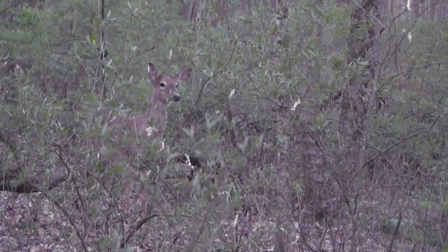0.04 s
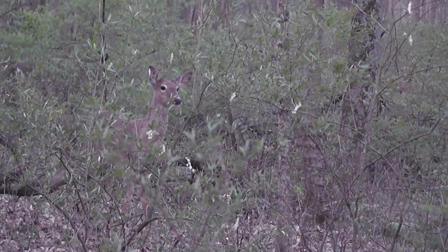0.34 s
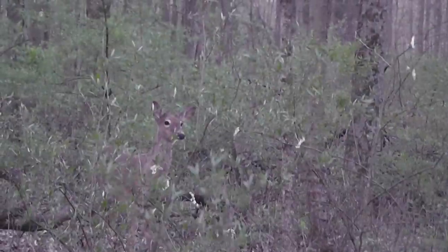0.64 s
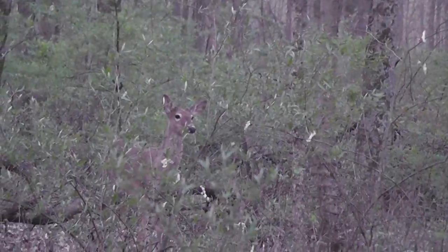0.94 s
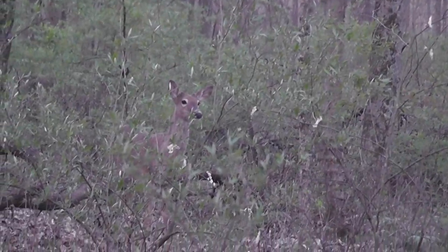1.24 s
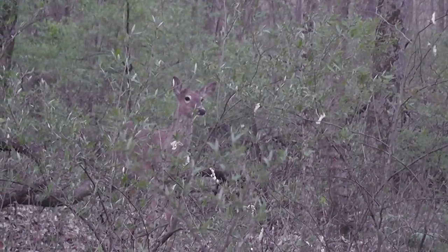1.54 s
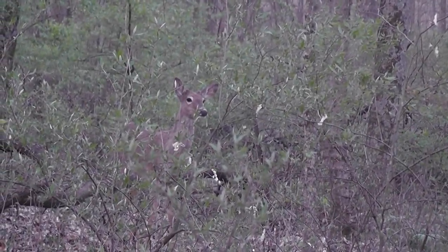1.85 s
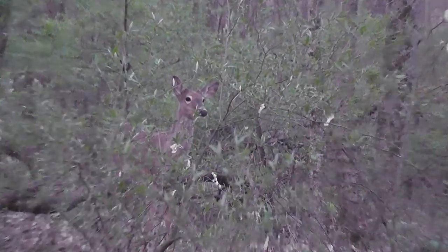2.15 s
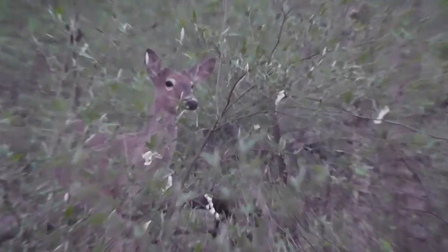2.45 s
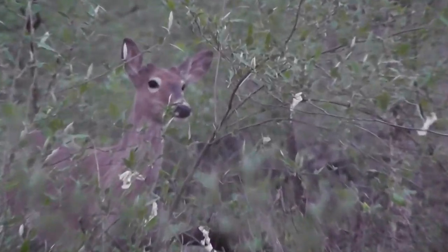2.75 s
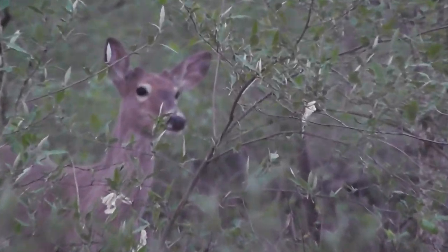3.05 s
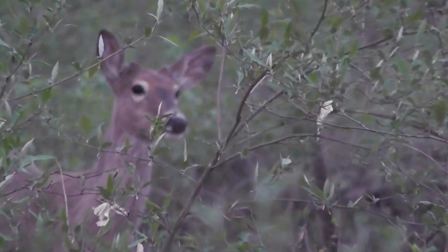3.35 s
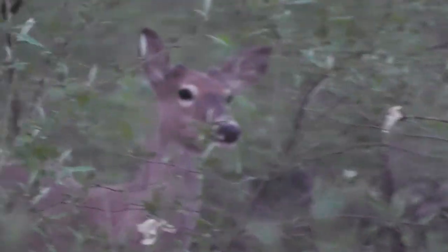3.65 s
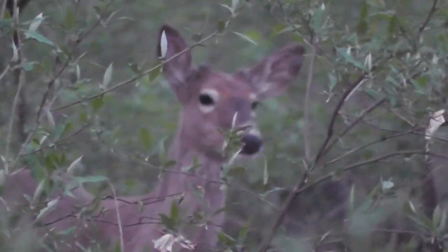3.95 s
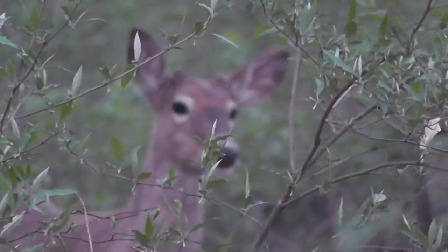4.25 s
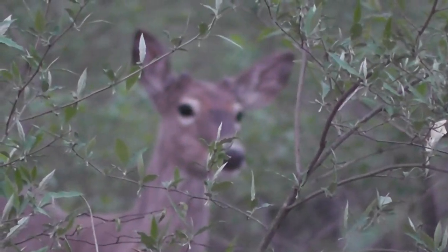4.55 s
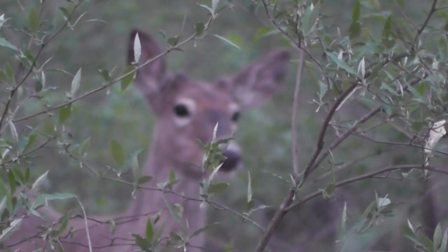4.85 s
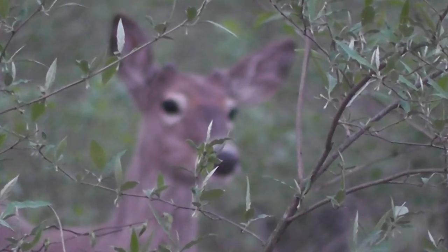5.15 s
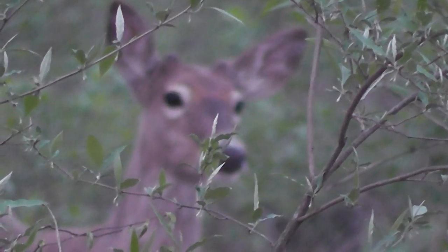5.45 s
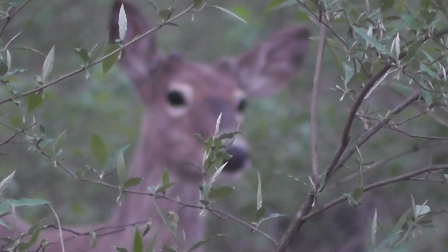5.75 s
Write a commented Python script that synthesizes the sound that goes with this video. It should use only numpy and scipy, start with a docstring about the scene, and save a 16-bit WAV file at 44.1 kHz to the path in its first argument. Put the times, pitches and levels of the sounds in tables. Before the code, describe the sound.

Faint songbirds chirp in quiet woods while a hand-held camera clicks sharply up close and its zoom softly ticks and whirs.

```python
"""A few sharp, close clicks knock a small hard body, like a hand-held camera's, and make it ring.
Around it are quiet woods, where songbirds whistle sliding notes that echo among the trunks.
The camera's lens drive ticks and whirs faintly, and there are two dry snaps and a few soft rustles.
Under it all lie a distant rumble, gently moving air and a faint low hum."""
import sys
import numpy as np
from scipy import signal
from scipy.fft import rfft, irfft, next_fast_len
from scipy.io import wavfile
from scipy.ndimage import uniform_filter1d, map_coordinates

SR = 44100
rng = np.random.default_rng(int(sys.argv[2]) if len(sys.argv) > 2 else 0)


def persist_wave(psi):
    """Save psi, clipped to +-1, as 16-bit WAV."""
    counts = np.round(np.clip(psi, -1, 1) * 32767).astype(np.int16)
    wavfile.write(sys.argv[1], SR, np.atleast_2d(counts).T)


N = 265023
TIME = np.arange(N) / SR


def amp(db):
    """Turn decibels into a number to multiply by."""
    return 10 ** (np.asarray(db) / 20)


def unit(x):
    """Scale a signal to an average power of 1."""
    return x / np.sqrt(np.mean(x ** 2) + 1e-20)


def along(points, hz):
    """Read between (Hz, value) points, giving each octave the same room."""
    point_hz, values = np.transpose(points)
    return np.interp(np.log(hz + 1), np.log(point_hz + 1), values)


def wobble(rate):
    """A smooth curve through `rate` random values a second."""
    return map_coordinates(rng.standard_normal(int(N * rate / SR) + 4), [TIME * rate])


def gate(t, start, stop, ramp_s):
    """Rise from start, hold, and fall to nothing at stop."""
    return np.clip(np.minimum(t - start, stop - t) / ramp_s, 0, 1)


def add(track, start, sound):
    """Mix a sound into a track, from `start` seconds on."""
    part = track[..., max(0, round(start * SR)):][..., :sound.shape[-1]]
    part += sound[..., :part.shape[-1]]


def panned(x, db):
    """Make a stereo sound whose left side is `db` louder than its right."""
    return x * amp([[db / 2], [-db / 2]])


def filtered(x, response):
    """Multiply each frequency in x by response(hz)."""
    n = x.shape[-1]
    size = next_fast_len(n + SR // 4)
    return irfft(rfft(x, size) * response(np.fft.rfftfreq(size, 1 / SR)), size)[..., :n]


def leaned(x, points):
    """Pan each frequency by its own amount, given (Hz, dB of left over right) points."""
    return filtered(x, lambda hz: amp(np.outer([0.5, -0.5], along(points, hz))))


def resonances(modes, hz):
    """How strongly an object answers each frequency, given its (Hz, width in Hz, dB) ringing tones."""
    return sum((-1) ** k * amp(db) * 1j * hz * width / (centre ** 2 - hz ** 2 + 1j * hz * width)
               for k, (centre, width, db) in enumerate(modes))


def pulse(colour, size=4096):
    """The most sudden pulse that has the given (Hz, dB) tone colour (minimum phase)."""
    cepstrum = irfft(np.log(amp(along(colour, np.fft.rfftfreq(size, 1 / SR)))))
    cepstrum[1:size // 2] *= 2
    cepstrum[size // 2 + 1:] = 0
    return irfft(np.exp(rfft(cepstrum)))


def rush(colour, patchy_db):
    """Wide stereo noise with a (Hz, dB) tone colour and random louder and softer patches."""
    # How alike the two sides are. Each row: frequency in Hz, likeness from 0 to 1.
    likeness = [(35, 0.1), (75, 0.82), (120, 0.79), (240, 0.12), (480, 0.12), (950, 0.148), (1890, 0.55),
                (3770, 0.82), (7520, 0.84), (15000, 0.26)]
    # Which way the noise leans. Each row: frequency in Hz, left over right in dB.
    lean = [(60, -3), (130, 1), (290, -0.5), (640, -0.5), (1410, -0.5), (3100, 0), (6820, 0.0),
            (15000, 0.0)]

    def middle_and_side(hz):
        angle = np.arccos(along(likeness, hz)) / 2
        return amp(along(colour, hz)) * [np.cos(angle), np.sin(angle)]

    spectra = signal.stft(rng.standard_normal((2, N)), nperseg=512)[2]
    patches = uniform_filter1d(rng.standard_normal(spectra.shape[1:]), size=5, axis=0)
    patches = unit(uniform_filter1d(patches, size=16, axis=1))
    noise = signal.istft(spectra * amp(patchy_db * patches), nperseg=512)[1][:, :N]
    mid, side = filtered(noise, middle_and_side)
    return unit(leaned(np.array([mid + side, mid - side]), lean))


def hush(rumble_db=-58, air_db=-56.5, calming_db_per_s=0.2154):
    """A distant, gently swelling rumble under faint moving air that slowly calms."""
    # Tone colours of the rumble and the air. Each row: frequency in Hz, relative level in dB.
    rumble_colour = [(20, -43), (30, -31), (40, -13), (62, -10), (85, 2.5), (110, -1), (135, -5.5),
                     (170, -4), (250, -16.5), (400, -12.5), (900, -64.5)]
    air_colour = [(100, -11.5), (250, 1), (400, -1.5), (700, -3), (1100, -7), (1600, -11.5), (2200, -16),
                  (3600, -22), (5000, -25), (8000, -31), (11000, -33.5), (15500, -35.5)]
    rumble = amp(rumble_db + 0.97 * wobble(4.56)) * rush(rumble_colour, patchy_db=0.5)
    air = amp(air_db - calming_db_per_s * TIME) * rush(air_colour, patchy_db=1.4)
    return rumble + air


def drone(hz=134, waver_hz=2.57, level_db=-63.5):
    """A faint low hum that wavers in pitch and strength."""
    phase = 2 * np.pi * np.cumsum(hz + waver_hz * wobble(9)) / SR
    return panned(amp(level_db + 2.03 * wobble(6)) * np.sin(phase), db=-6)


def rustles():
    """Brief, soft brushing sounds: fluttering swells of noise."""
    # The swells. Each row: time of the peak in seconds, half length in seconds, level in dB.
    brushes = [(2.044, .012, -67), (2.118, 0.07, -66), (4.201, 0.026, -61), (4.887, 0.048, -64),
               (5.68, 0.088, -70), (5.915, 0.039, -61.5)]
    # Their tone colour. Each row: frequency in Hz, relative level in dB.
    colour = [(200, -26), (700, -13.5), (2000, 0.5), (4500, -2.5), (8000, -8.5), (15000, -19)]
    swell = sum(amp(db) * np.exp(-((TIME - peak) / half) ** 2) for peak, half, db in brushes)
    return swell * amp(2.2 * wobble(150)) * rush(colour, patchy_db=4.5)


def woods(call, fade_s, echo_db, side_db):
    """Trunks scatter a call into an echo, nearly alike on both sides, that falls 60 dB in fade_s."""
    t = np.arange(SR) / SR
    tails = rng.standard_normal((2, SR)) * amp(-60 * t / fade_s) * (1 - np.exp(-t / 0.012))
    tails *= amp(echo_db) / np.linalg.norm(tails[0])
    mid, side = signal.fftconvolve(call[None], tails, axes=1)[:, :N]
    return call + mid + amp(side_db) * np.array([side, -side])


def whistles(notes, fade_share, swell_db_per_octave, warble_hz):
    """Pure notes that glide through a start, middle and end pitch, and may warble on the way."""
    out = np.zeros(N)
    for start, length, pitches, db, depth_hz in notes:
        t = np.arange(int(length * SR)) / SR
        progress = t / length
        glide = np.polyval(np.polyfit([0, 0.5, 1], pitches, 2), progress)
        pitch = glide + depth_hz * np.sin(2 * np.pi * (warble_hz * t + rng.random()))
        shape = np.sin(np.pi / 2 * gate(progress, 0, 1, fade_share))
        swell_db = swell_db_per_octave * np.log2(pitches[2] / pitches[0]) * (progress - 0.5)
        add(out, start, amp(db + swell_db) * shape * np.sin(2 * np.pi * np.cumsum(pitch) / SR))
    return out


def bird_haze():
    """The farthest birds blur into a high haze of noise."""
    # How loud the haze is. Each row: time in seconds, level in dB.
    levels = [(0, -74.5), (1.5, -67), (3.4, -65.5), (4.5, -62.5), (5.3, -69)]
    # Its tone colour. Each row: frequency in Hz, relative level in dB.
    colour = [(1200, -34.5), (1800, 2.5), (2300, -1.5), (2800, 3), (3300, -1), (3800, -2), (4500, -11),
              (5500, -28), (9000, -51)]
    return amp(np.interp(TIME, *np.transpose(levels))) * rush(colour, patchy_db=4)


def far_birds(arch_s=0.0482, sag_s=0.173, rise_s=0.089):
    """Birds farther off whistle and chirp, blurred by long echoes."""
    # One bird pairs a short arched note with a long sagging one. Each row: start in seconds, base
    # pitch in Hz, level in dB, then the long note's delay in seconds, base pitch in Hz, level in dB.
    pairs = [(0, 2786, -54.5, 0.05, 2553, -56.5), (0.341, 2693, -51, 0.14, 2515, -60),
             (3.486, 2720, -52.5, .165, 2575, -56.5), (3.932, 2720, -48, 0.13, 2523, -57.5)]
    # Another repeats a slightly rising note. Each row: start in seconds, base pitch in Hz, level in dB.
    rises = [(1.126, 2720, -64), (1.374, 2735, -66), (1.99, 2780, -63.5), (2.345, 2874, -58),
             (2.711, 2886, -57.5), (3.07, 2797, -60)]
    # Scattered chirps, most of them buzzy. Each row: start and length in seconds,
    # first and last pitch in Hz, level in dB, warble depth in Hz.
    chirps = [(.89, 0.039, 2610, 2515, -57, 2), (1.602, 0.049, 3950, 4500, -65, 90),
              (1.88, .07, 3150, 5700, -73.5, -3), (2.093, 0.0465, 4920, 4450, -67, 200),
              (2.295, 0.042, 6820, 7040, -66.5, 40), (2.548, 0.042, 3700, 3870, -57, 132),
              (2.609, 0.033, 4350, 4300, -62, 0), (2.641, .13, 3100, 3423, -54.5, 110),
              (2.782, 0.085, 3380, 3370, -59.5, 93), (3.679, 0.054, 3390, 3120, -60, 60),
              (3.866, 0.042, 2400, 2050, -58.5, 2), (4.055, 0.044, 2750, 3140, -59, 0),
              (4.204, .05, 3420, 3100, -58.5, 88), (4.364, 0.102, 2344, 2210, -59.5, 98),
              (4.477, 0.033, 7460, 7000, -70, 149), (4.567, 0.025, 2730, 3080, -53.5, -3),
              (4.609, 0.062, 3320, 3340, -57, 65), (4.617, 0.347, 3710, 3760, -72, 52),
              (4.68, 0.051, 2850, 2785, -58.5, 1), (4.96, 0.0676, 2890, 2750, -67, 0.5),
              (5.93, .08, 6640, 6160, -70, 253)]
    # Start, middle and end pitch, as multiples of the base pitch.
    arch, sag, rise = np.array([(0.94, 0.99, 0.95), (1.03, 0.99, 1.012), (0.94, 0.96, 0.95)])
    notes = [(start, arch_s, arch * hz, db, 0) for start, hz, db, *_ in pairs]
    notes += [(start + delay, sag_s, sag * hz, db, 0) for start, _, _, delay, hz, db in pairs]
    notes += [(start, rise_s, rise * hz, db, 0) for start, hz, db in rises]
    for start, length, first_hz, last_hz, db, depth_hz in chirps:
        middle_hz = first_hz + 0.8 * (last_hz - first_hz)  # glides fast, then settles
        notes.append((start, length, (first_hz, middle_hz, last_hz), db, depth_hz))
    calls = whistles(notes, fade_share=0.17, swell_db_per_octave=-1, warble_hz=69.6)
    return panned(woods(calls, fade_s=1.4, echo_db=-1, side_db=-12.5), db=-1)


def near_bird(dip_s=0.0405):
    """The nearest bird, to the left, repeats an upward slide that runs into a quick dip."""
    # Its phrases. Each row: start in seconds, slide length in seconds, top pitch in Hz, level in dB.
    phrases = [(2.15, .085, 2656, -56), (2.41, .09, 2660, -53), (5.303, 0.088, 2710, -48),
               (5.579, .092, 2730, -45), (5.862, 0.093, 2707, -45)]
    # Start, middle and end pitch, as shares of the top pitch.
    slide, dip = np.array([(0.87, 0.957, 1), (0.98, 0.856, 0.95)])
    notes = []
    for start, length, hz, db in phrases:
        notes.append((start, length, slide * hz, db, 0))
        notes.append((start + length, dip_s, dip * hz, db - 2, 0))
    song = whistles(notes, fade_share=0.19, swell_db_per_octave=29, warble_hz=0)
    return panned(woods(song, fade_s=0.74, echo_db=-0.5, side_db=-8.5), db=4.5)


def lens_ticks(steps_per_s=59.94, slowest_at=0.4, slow_width=0.28):
    """Each step of the lens drive taps the barrel; the steps weaken and limp where the drive slows."""
    # Runs of the drive. Each row: start and stop in seconds, relative level in dB, slowing from 0 to 1.
    runs = [(.615, 1.352, -60.5, 0), (2.063, 4.765, -60.5, 1)]
    # The slow gears catch. Each row: time in seconds, relative level in dB.
    catches = [(2.621, -57), (2.791, -59), (2.887, -59), (3.256, -63), (3.456, -60)]
    # The barrel's ringing tones. Each row: pitch in Hz, width in Hz, relative level in dB.
    barrel = [(1644, 53, 0.5), (2850, 320, -6), (3380, 670, -6), (3690, 290, -0.5), (5580, 370, -18)]
    steps = np.arange(0.635, N / SR, 1 / steps_per_s)
    every_other = np.arange(len(steps)) % 2 == 0
    scatter = rng.standard_normal(len(steps))
    limp_db = -4 - 10 * every_other - 0.5 * scatter  # every other step nearly drops out
    taps = np.zeros(N)
    for start, stop, db, slowing in runs:
        progress = (steps - start) / (stop - start)
        slowness = slowing * np.exp(-((progress - slowest_at) / slow_width) ** 2)
        step_db = db + 0.46 * scatter + slowness * limp_db
        taps[(steps * SR).astype(int)] += amp(step_db) * gate(steps, start, stop, ramp_s=0.028)
    for start, db in catches:
        add(taps, start, amp([db]))
    # A moment of gear chatter follows each tap.
    decay = amp(-60 * TIME[:SR // 50] / 0.025)
    chatter = signal.fftconvolve(taps, decay)[:N] * np.sign(rng.standard_normal(N))
    ticks = filtered(taps + amp(-19) * chatter, lambda hz: resonances(barrel, hz))
    return panned(amp(40.5) * ticks, db=0.5)


def zoom_whir(start=2.03, stop=5, level_db=-73.5, fade_db_per_s=3.5):
    """The zoom gears make a thin whir that fades as they run."""
    # The whir's tone colour. Each row: frequency in Hz, relative level in dB.
    colour = [(2500, -23), (4200, -4.5), (5400, 4), (6500, 3.5), (8000, -5), (8500, 5), (9100, -4),
              (9500, 3), (9900, 4), (10400, -2), (11200, -1.5), (12500, -12.5), (15000, -7)]
    level = amp(level_db - fade_db_per_s * (TIME - start)) * gate(TIME, start, stop, ramp_s=0.21)
    return level * rush(colour, patchy_db=-2)


def snaps():
    """Tiny dry snaps: one sharp spike each, thin in the bass and with no ring."""
    # Each row: time in seconds, level in dB, top of the treble in Hz, left over right in dB.
    spikes = [(3.1456, -19.5, 6300, 2), (3.3145, -19.5, 11400, -4.5)]
    out = np.zeros((2, N))
    for start, db, top_hz, pan_db in spikes:
        spike = pulse([(100, -25), (1500, -8), (3500, -1), (5000, 0), (top_hz, -2), (2 * top_hz, -26)])
        add(out, start, panned(amp(db) * spike, pan_db))
    return out


def thuds(hz=165, fade_s=0.056, attack_s=0.0012):
    """Around the hardest clicks, the whole body rocks for a few cycles."""
    # Dull, low jolts. Each row: start in seconds, level in dB.
    jolts = [(0.516, -31), (0.551, -32), (0.581, -34), (.597, -38), (3.56, -35.5)]
    out, t = np.zeros(N), TIME[:SR // 6]
    rocking = amp(-60 * t / fade_s) * (1 - np.exp(-t / attack_s)) * np.sin(2 * np.pi * hz * t)
    for start, db in jolts:
        add(out, start, amp(db) * rocking)
    return panned(out, db=5.5)


def clicks(crack_fade_s=0.017, crack_attack_s=0.00069, tail_fade_s=0.057):
    """Each contact cracks and rings the same small body, with its own brightness and favoured tone."""
    # Each row: start in seconds; relative levels in dB of the whole click, its low thump, its snap
    # and its treble; favoured tone in Hz; that tone's strength in dB; left over right in dB.
    contacts = [(.508, -20.5, 7, 5.5, 1, 3680, -6, -1), (0.5461, 3, 10, 6.5, 9, 1943, 3, 0.5),
                (.8629, -1, 8.5, -1.5, 13, 5550, 0, -0.5), (.8936, -9, 2, -4.5, -20, 1420, -22, 0.5),
                (1.0009, -1, -1.5, -4.5, -11, 1420, -31, -1), (1.1686, 0, -2, -2.5, -8.5, 9000, 11, -.5),
                (1.196, -13.5, 7.5, -3.5, -32, 1420, -4, -1), (1.2546, -14.5, 9, -9, -42, 1420, -6, -2),
                (3.5561, -6, 9, 7, 10.5, 2930, 11, 0), (3.5584, -1, 6.5, -2.5, 8.5, 808, 9, -1)]
    # The body's ringing tones. Each row: pitch in Hz, width in Hz, relative level in dB.
    body_tones = [(180, 67, 3), (257, 15, -5.5), (467, 49, 5), (652, 81, 12.5), (759, 44, 15.5),
                  (867, 47, 11), (1188, 22, -13), (1240, 27, -7.5), (1420, 105, 10.5), (1740, 86, -0.5),
                  (2062, 73, 6), (2254, 28, 3), (2317, 94, -1), (2710, 240, -12.5), (4010, 140, 3.5),
                  (4630, 220, 0.5), (5550, 430, 0), (6810, 380, -6), (7720, 1000, -8), (9700, 530, -33),
                  (12960, 790, -21)]
    # Tones that shake the two microphones in opposite directions, with the same columns.
    sway_tones = [(290, 67, 5), (620, 190, -8.5), (1387, 120, -13), (2102, 230, -29.5)]
    # Tone colours. Each pair: frequency in Hz, relative level in dB.
    crack_colour = [(100, -7), (400, -14), (2000, 1.5), (5000, -3), (9000, -20.5),
                    (13000, -30.5), (16000, -33)]
    tail_colour = [(60, -36), (250, -22), (900, -20), (2500, -25.5), (6000, -42), (14000, -59)]
    out, t = np.zeros((2, N)), TIME[:SR // 6]
    tap = signal.unit_impulse(len(t))
    body = filtered(tap, lambda hz: resonances(body_tones, hz))
    sway = filtered(tap, lambda hz: resonances(sway_tones, hz))
    ring = np.array([body + sway, body - sway])
    for start, db, thump_db, snap_db, treble_db, ring_hz, ring_db, pan_db in contacts:
        noise = rng.standard_normal((3, len(t)))
        crack = noise[0] * amp(-60 * t / crack_fade_s) * (1 - np.exp(-t / crack_attack_s))
        crack = filtered(crack / np.linalg.norm(crack), lambda hz: amp(along(crack_colour, hz)))
        crack = leaned(crack, [(5000, 0), (13000, 13)])  # more treble on the left
        # A weak, scattered tail, different on each side.
        tail = filtered(noise[1:] * amp(-60 * t / tail_fade_s), lambda hz: amp(along(tail_colour, hz)))
        knock_db = -2.5 + 0.56 * thump_db  # the hollow knock grows with the thump
        blow = pulse([(40, -7.5), (170, thump_db), (330, thump_db), (560, knock_db), (790, knock_db),
                      (1400, 4.5), (2100, snap_db), (3400, snap_db),
                      (8000, treble_db), (13000, treble_db), (16000, treble_db - 11.5)])
        click = signal.fftconvolve(ring + crack + tail, blow[None], axes=1)
        click = filtered(click, lambda hz: 1 + resonances([(ring_hz, 0.085 * ring_hz, ring_db)], hz))
        add(out, start, panned(amp(db) * click, pan_db))
    return out


def scene():
    """The woods and their birds, with the small close sounds on top."""
    outdoors = hush() + drone() + near_bird() + far_birds() + bird_haze()
    return outdoors + clicks() + snaps() + thuds() + lens_ticks() + zoom_whir() + rustles()


def record(dry, top_hz=15950):
    """The camera cuts off the very highest treble."""
    return filtered(dry, lambda hz: 1 / (1 + (hz / top_hz) ** 120))


dry = scene()
out = record(dry)
persist_wave(out)
```